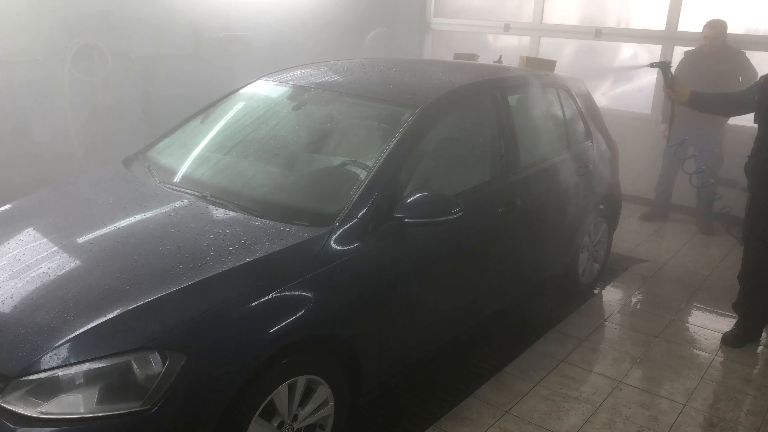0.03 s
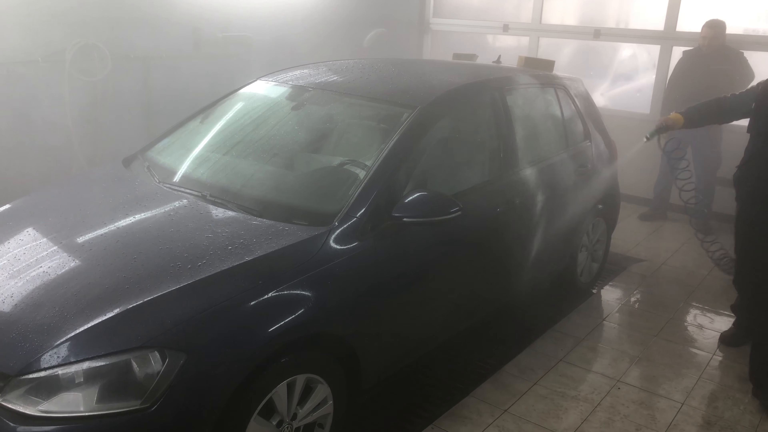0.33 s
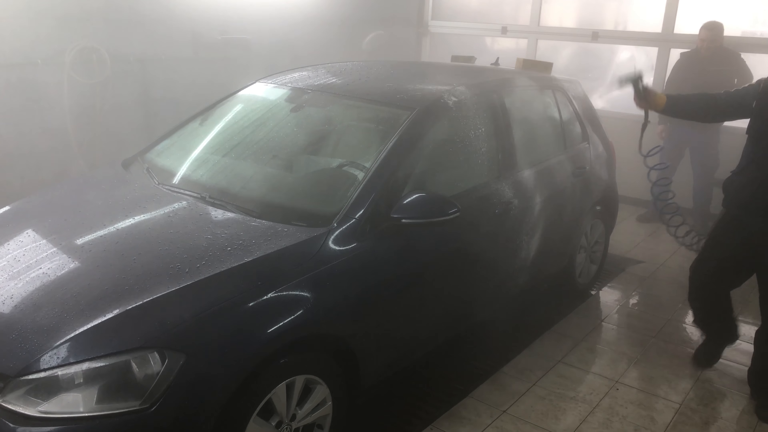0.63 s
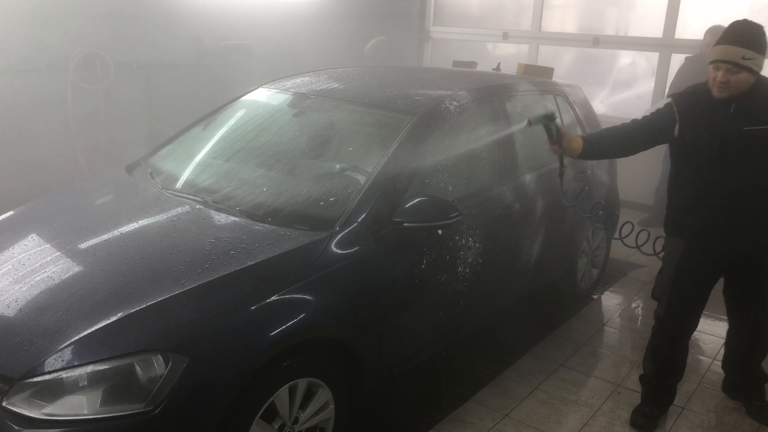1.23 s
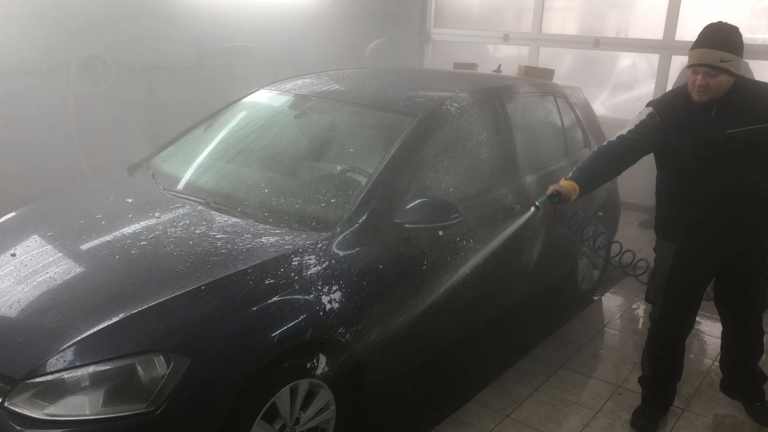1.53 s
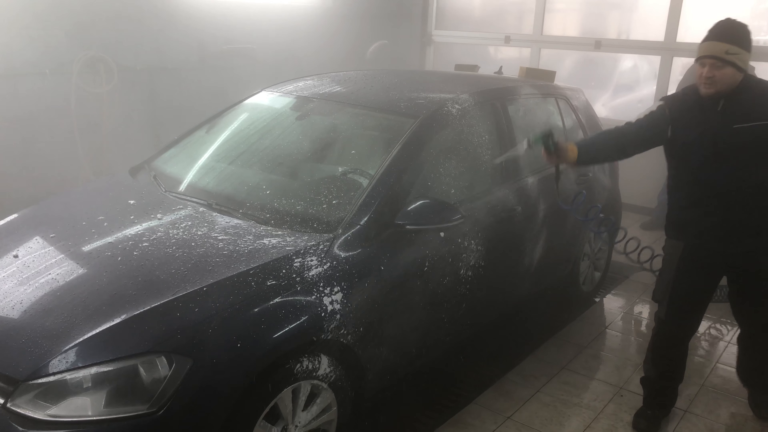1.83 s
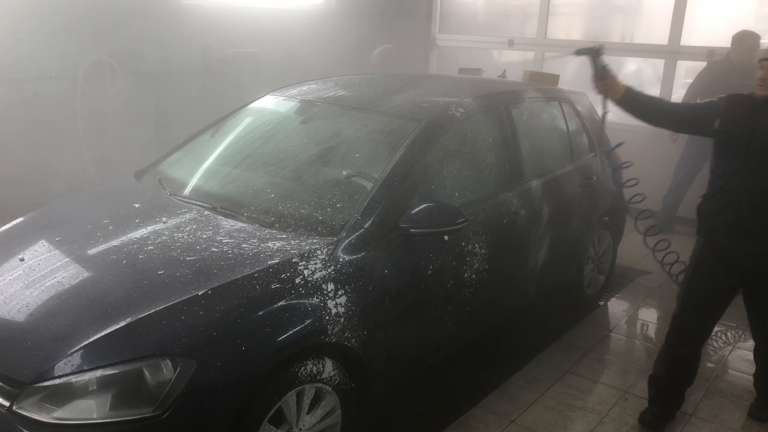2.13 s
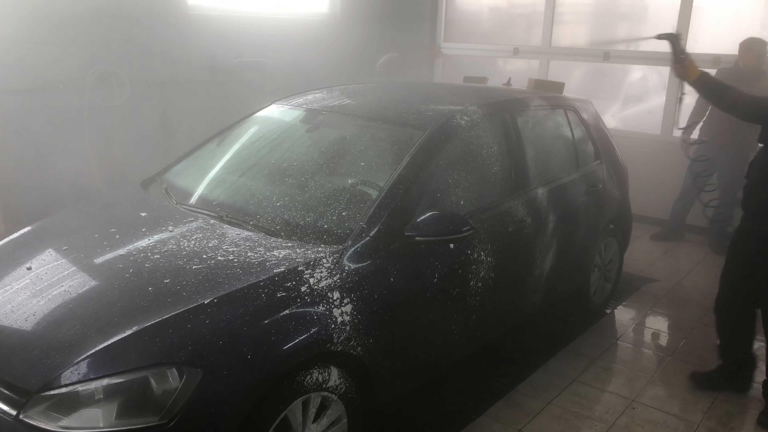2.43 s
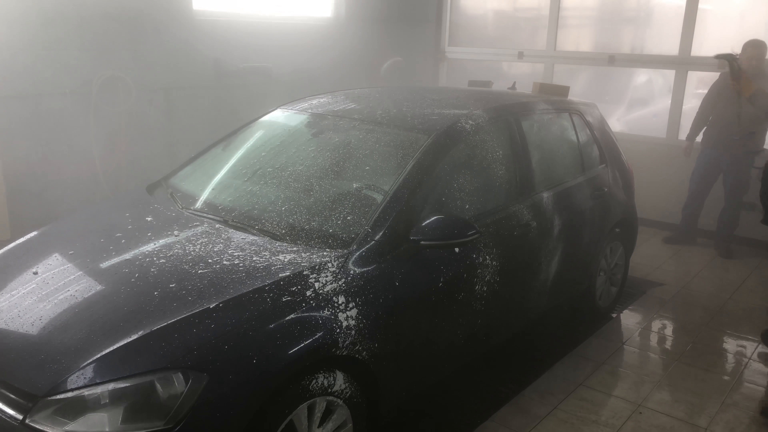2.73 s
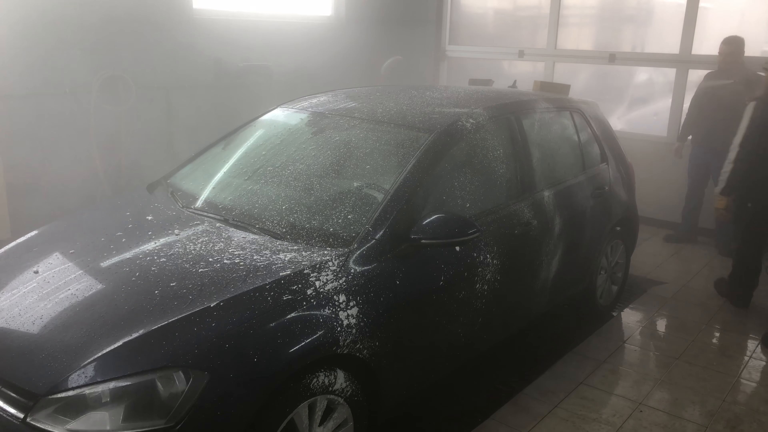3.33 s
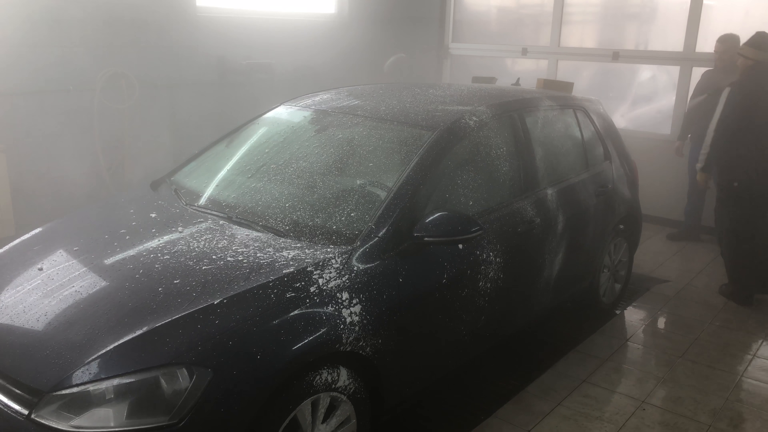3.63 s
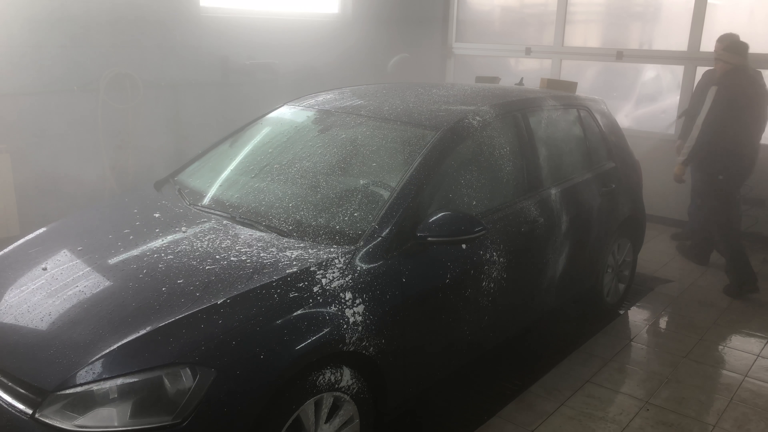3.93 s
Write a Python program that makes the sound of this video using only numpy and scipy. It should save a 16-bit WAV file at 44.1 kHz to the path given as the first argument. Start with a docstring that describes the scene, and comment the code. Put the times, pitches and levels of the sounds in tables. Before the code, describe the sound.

Hissing water spray rinses a car in an echoing wash bay, with one short, sputtering break.

```python
"""A tiled wash bay, the microphone a few metres from a car being rinsed with a pressure spray gun.
The nozzle hisses, stops for a moment, sputters back and then runs steadily as it is swung away.
Its mist patters on glass and paint and drums the body panels, over the low roar of the air stream
and a faint hum. The tiles ring with the hiss and the patter."""
import sys
import numpy as np
from scipy import signal
from scipy.fft import rfft, irfft
from scipy.io import wavfile
from scipy.ndimage import map_coordinates

SR = 44100
rng = np.random.default_rng(int(sys.argv[2]) if len(sys.argv) > 2 else 0)


def wav_out(sig):
    """Save sig, one row per channel (or a flat mono array), as 16-bit PCM at SR to the path in sys.argv[1]."""
    wavfile.write(sys.argv[1], SR, np.round(np.clip(np.atleast_2d(sig).T, -1, 1) * 32767).astype(np.int16))


N = 176400
TIMES, FREQS = np.arange(N) / SR, np.fft.rfftfreq(N, 1 / SR)
TOP_HZ = 17250


def undb(db):
    """Decibels to gain."""
    return 10 ** (np.asarray(db) / 20)


def unit(x):
    """Scale to rms 1."""
    return x / np.sqrt(np.mean(x ** 2))


def curve(rows):
    """Join (seconds, value) rows by straight lines."""
    return np.interp(TIMES, *np.array(rows).T)


def over_hz(rows, hz):
    """Read (Hz, value) rows on a log-frequency axis."""
    rows = np.array(rows)
    return np.interp(np.log(hz + 1), np.log(rows[:, 0]), rows[:, 1])


def colour(x, rows):
    """Filter x through (Hz, dB) points and scale to rms 1."""
    return unit(irfft(rfft(x) * undb(over_hz(rows, FREQS)), N))


def bands(x, count):
    """Split x into overlapping bands that sum to x; yields (centre Hz, band)."""
    centres = np.linspace(10, np.sqrt(TOP_HZ), count) ** 2
    spectrum = rfft(x)
    for hz, pick in zip(centres, np.eye(count)):
        yield hz, irfft(spectrum * np.interp(FREQS, centres, pick), N)


def wander(per_s, points=2048):
    """A random curve of spread near 1 that turns per_s times a second."""
    return np.interp(TIMES * per_s, np.arange(points), rng.standard_normal(points)) * np.sqrt(3 / 2)


def droplets(per_s=9000, spread_db=4):
    """Dense random impacts of uneven size."""
    hits = rng.random(N) < per_s / SR
    return hits * rng.standard_normal(N) * undb(spread_db * rng.standard_normal(N))


# The ring of the tiled bay. Each row: frequency in Hz, seconds to die away by 60 dB.
BAY_DECAY = [(100, 1.5), (1000, 0.64), (2200, 1.3), (5000, 1.5), (9000, 1), (12500, 0.87), (14000, 0.5),
             (17000, 0.57)]


def bay_ring(x, gap_s=0.0067):
    """The diffuse tail from the tiles, reaching the microphone after a short gap."""
    tail = sum(band * undb(-60 * TIMES / over_hz(BAY_DECAY, hz))
               for hz, band in bands(rng.standard_normal(N), count=16))
    tail *= TIMES > gap_s
    tail /= np.sqrt(np.sum(tail ** 2))
    return irfft(rfft(x) * rfft(tail), N)


# A glancing reflection off a surface close by. Each row: time in seconds, lag in milliseconds.
GLANCE_LAG = [(0, 0.85), (2.15, 0.93), (2.55, .844), (2.85, 0.87), (3.15, 0.675), (3.5, 0.5), (4, 0.58)]


def with_glance(x, reflection_db=-18.5):
    """Add a short, inverted reflection whose lag moves with the gun and sweeps the hiss."""
    lag_s = curve(GLANCE_LAG) / 1000
    reflection = map_coordinates(x, [np.arange(N) - lag_s * SR], order=3, mode="mirror")
    return x - undb(reflection_db) * reflection


def hum(hz=56, width_hz=4, level_db=-61.5):
    """A faint, uneven hum under everything: noise in one narrow low band."""
    spectrum = rfft(rng.standard_normal(N)) / (1 + ((FREQS - hz) / width_hz) ** 2)
    return unit(irfft(spectrum, N)) * undb(level_db)


# The swell of the air stream. Each row: time in seconds, relative level in dB.
ROAR_LEVEL = [(0.09, -45), (0.5, -39), (1.23, -45.5), (1.28, -39.5), (2.29, -43.5), (2.3, -39),
              (3.11, -37.5), (3.17, -39.5), (3.8, -35.5), (4.0, -38.5)]
# Its spectrum. Each row: frequency in Hz, relative level in dB.
ROAR_SPECTRUM = [(18, -50), (30, -38), (48, -36), (80, -17), (200, -6.5), (300, 2), (360, 1.5), (450, -1),
                 (600, 2.5), (1200, -16)]


def air_roar(gain_db=1.5):
    """Low turbulence of the air stream."""
    return colour(rng.standard_normal(N), ROAR_SPECTRUM) * undb(curve(ROAR_LEVEL) + gain_db)


# The car's body drumming under the jet. Each row: time in seconds, relative level in dB.
DRUM_LEVEL = [(.09, -42), (.13, -34.5), (.32, -36.5), (.65, -42), (.98, -43.5), (1.25, -43), (1.65, -38),
              (2, -41.5), (2.5, -41.5), (2.87, -36.5), (3.3, -47), (3.5, -46.5), (4, -45)]
# The panels' resonances. Each row: frequency in Hz, half-width in Hz, relative level in dB.
PANEL_MODES = [(109.5, 17, -2), (128, 36, -3), (194, 58, -2.5), (249, 21, -1)]


def panel_drumming(low_cut_hz=41, gain_db=-3):
    """Droplets excite the broad low resonances of doors and bonnet."""
    freqs = FREQS + 1  # avoids dividing by zero
    power = sum((undb(db) / (1 + ((freqs - hz) / width) ** 2)) ** 2 for hz, width, db in PANEL_MODES)
    response = np.sqrt(power) / (1 + (low_cut_hz / freqs) ** 4)
    drumming = irfft(rfft(droplets()) * response, N)
    return unit(drumming) * undb(curve(DRUM_LEVEL) + gain_db)


# Mist striking the car, a few metres off. Each row: time in seconds, relative level in dB.
PATTER_LEVEL = [(.09, -30), (.3, -25), (.52, -29.5), (.62, -30.5), (.8, -27.5), (.92, -36), (1.02, -34.5),
                (1.15, -40), (1.19, -37), (1.3, -30.5), (1.52, -30), (1.62, -27), (1.72, -38), (1.8, -30.5),
                (1.89, -28.5), (1.96, -35), (2.12, -33), (2.165, -29), (2.23, -25.5), (2.3, -32),
                (2.38, -27.5), (2.6, -28), (3.04, -26.5), (3.14, -29), (3.33, -30.5), (3.55, -30.5),
                (3.78, -31), (3.88, -28), (4, -32)]
# The spectrum of the impacts. Each row: frequency in Hz, relative level in dB.
PATTER_SPECTRUM = [(150, -33), (350, -6), (600, -10), (740, -0.5), (1000, -0.5), (1170, -1.5), (1400, -0.5),
                   (1650, -1.5), (2050, -6), (4000, -11.5), (9000, -13.5), (13000, -23), (17000, -40)]
# A hollow resonance that moves with the spot hit. Each row: time in seconds, centre in Hz, boost in dB.
HOLLOW_PATH = [(.1, 890, 7), (.3, 1350, -2), (.44, 1340, 9), (.6, 1230, -1), (.76, 880, 2), (1, 1060, 5),
               (1.24, 970, 11), (1.5, 1330, -0.5), (1.62, 850, 0), (1.94, 1550, 2), (2.23, 1290, 3),
               (2.39, 920, 6), (2.6, 1020, 6), (2.85, 1200, 2), (3.05, 1310, 6), (3.15, 844, 0),
               (3.32, 754, 7.5), (3.5, 910, -5), (3.66, 1630, 6), (3.78, 1000, 1), (3.9, 766, 7),
               (4, 790, -4)]


def mist_patter(hollow_octaves=0.14, gust_db=0.8, gain_db=-0.5):
    """Droplets patter on glass and paint in uneven gusts, with a wandering hollow resonance."""
    centre_hz = curve([(s, hz) for s, hz, db in HOLLOW_PATH])
    boost_db = curve([(s, db) for s, hz, db in HOLLOW_PATH])
    patter = 0
    for hz, band in bands(colour(droplets(), PATTER_SPECTRUM), count=60):
        nearness = np.exp(-(np.log2(hz / centre_hz) / hollow_octaves) ** 2)
        patter += band * undb(boost_db * nearness)
    return unit(patter) * undb(curve(PATTER_LEVEL) + gain_db + gust_db * wander(per_s=35))


# The nozzle sputtering back. Each row: start in seconds, relative level in dB.
SPIT_EVENTS = [(1.134, -20), (1.18, -17.5), (1.247, -19.5), (1.297, -15), (1.366, -18), (1.442, -16.5),
               (1.5, -15), (1.605, -22), (1.666, -12), (1.777, -16.5), (1.803, -25), (1.99, -18)]
# The spectrum of a spit. Each row: frequency in Hz, relative level in dB.
SPIT_SPECTRUM = [(200, -19), (1000, -7), (4000, -6.5), (8000, -3.5), (12000, -1.5), (14000, -3), (17000, 3)]


def nozzle_spits(attack_s=0.0017, decay_s=0.031):
    """The nozzle spits: bursts of noise that rise sharply and die away fast."""
    power = 0
    for start, db in SPIT_EVENTS:
        age = np.maximum(TIMES - start, 0)
        burst = undb(db) * np.minimum(age / attack_s, 1) * np.exp(-age / decay_s)
        power += burst ** 2
    return colour(rng.standard_normal(N), SPIT_SPECTRUM) * np.sqrt(power)


# The jet, a few metres from the microphone. Each row: time in seconds, relative level in dB.
JET_LEVEL = [(.08, -14), (.22, -14), (.32, -13), (.5, -16), (.7, -17.5), (.82, -20), (.895, -22),
             (.915, -25), (1.02, -47), (1.128, -45), (1.14, -24), (1.25, -21.5), (1.35, -21), (1.385, -14),
             (1.46, -20), (1.555, -40), (1.575, -17), (1.615, -15.5), (1.69, -28), (1.762, -25),
             (1.785, -19.5), (1.895, -16), (1.93, -29), (1.97, -27), (2.03, -21), (2.2, -19), (2.65, -16.5),
             (3.05, -18), (3.35, -17), (4, -18)]
# Its brightness as the gun is turned. Each row: time in seconds, tilt above 1 kHz in dB per octave.
JET_TILT = [(.1, 0.5), (.7, 0.24), (1.2, 2), (1.6, 1), (2.1, 2.5), (2.5, 1), (3, 1.7), (3.25, 2), (3.7, 2),
            (4, 1.5)]
# Its spectrum before the tilt. Each row: frequency in Hz, relative level in dB.
JET_SPECTRUM = [(200, -35), (900, -9), (1800, -11), (2300, -5.5), (2700, -8.5), (3000, -5.5), (3500, -6.5),
                (5000, -8), (7000, -7), (10000, -5), (12100, -2.5), (13400, -4.5), (15200, -3), (17000, 0)]


def jet_hiss(shimmer_db=1.3, pivot_hz=10000):
    """Turbulent hiss whose brightness follows the aim, while narrow bands of it swell and fade."""
    tilt = curve(JET_TILT)
    hiss = 0
    for hz, band in bands(colour(rng.standard_normal(N), JET_SPECTRUM), count=40):
        octaves = np.log2(max(hz, 1000) / pivot_hz)
        hiss += band * undb(tilt * octaves + shimmer_db * wander(per_s=30))
    return unit(hiss) * undb(curve(JET_LEVEL))


def spray_gun(flutter_db=1.04):
    """Hiss and spits leave the nozzle together, with a quick flutter in level."""
    return (jet_hiss() + nozzle_spits()) * undb(flutter_db * wander(per_s=70))


def scene(bay_db=-2, spray_db=-1):
    """At the microphone: gun and mist ringing in the bay, over drumming, roar and hum."""
    spray = spray_gun() + mist_patter()
    # The echo paths shift as the gun moves: drift between two independent tails.
    blend_rad = 1.5 * wander(per_s=4)
    walls = np.cos(blend_rad) * bay_ring(spray) + np.sin(blend_rad) * bay_ring(spray)
    spray_in_bay = with_glance(spray + undb(bay_db) * walls)
    return (spray_in_bay * undb(spray_db) + panel_drumming() + air_roar() + hum())[None]


def record(dry, open_at_s=0.0817, fade_in_s=0.0019):
    """The microphone opens abruptly on the running spray; the top is cut steeply."""
    opening = np.clip((TIMES - open_at_s) / fade_in_s, undb(-85), 1)
    low_pass = signal.ellip(12, 0.1, 75, TOP_HZ, fs=SR, output="sos")
    return signal.sosfilt(low_pass, dry * opening)


dry = scene()
out = record(dry)
wav_out(out)
```